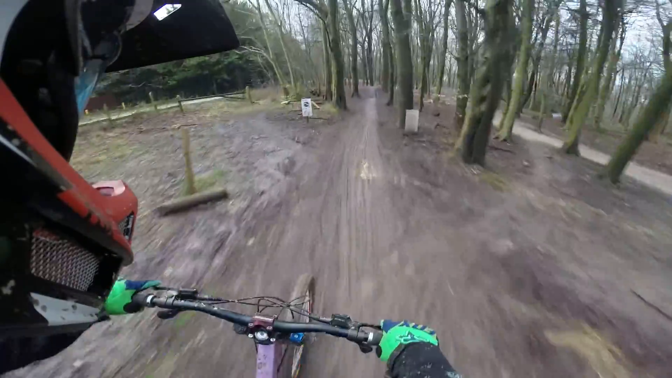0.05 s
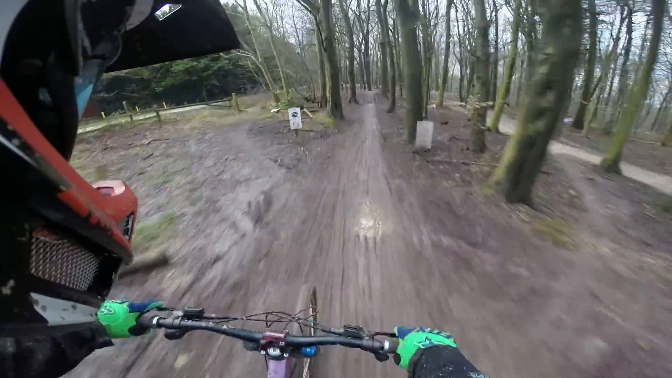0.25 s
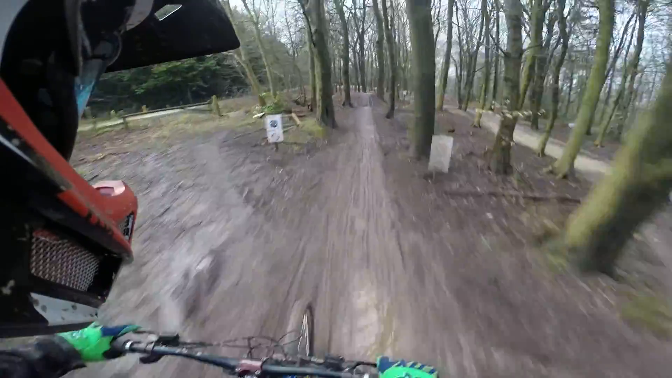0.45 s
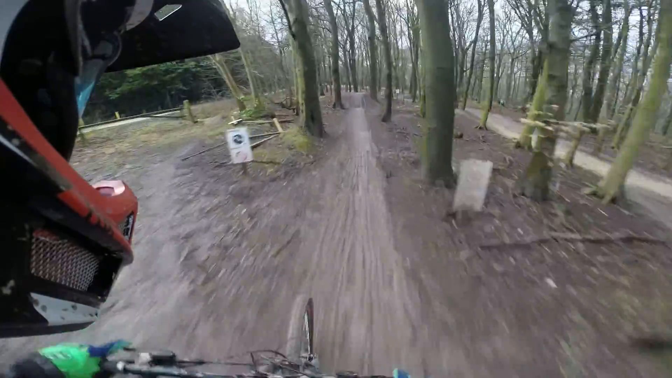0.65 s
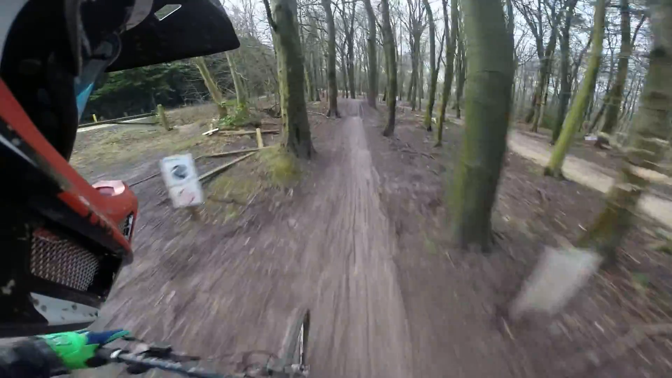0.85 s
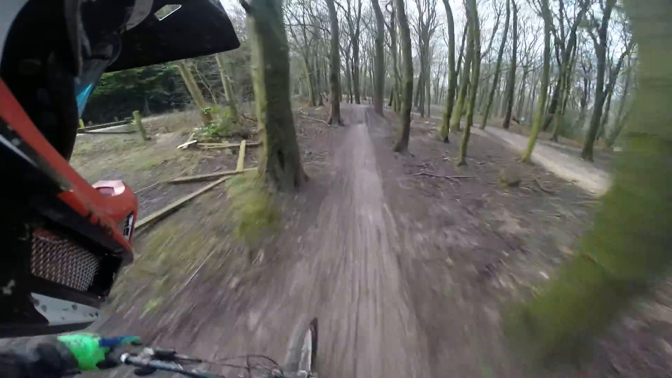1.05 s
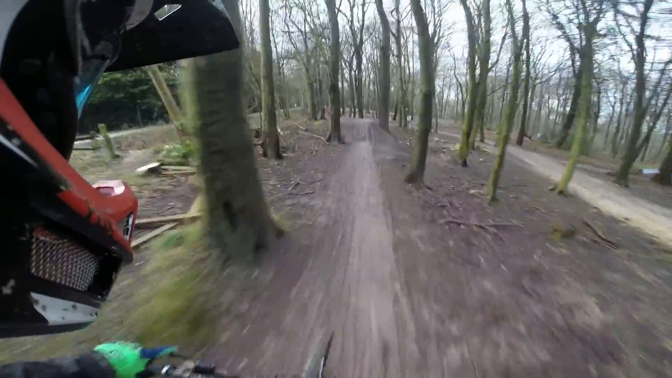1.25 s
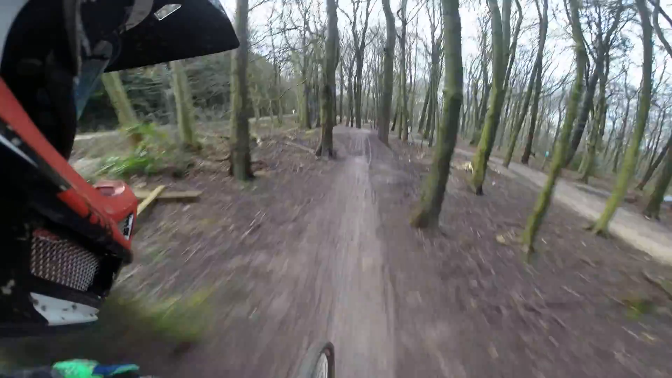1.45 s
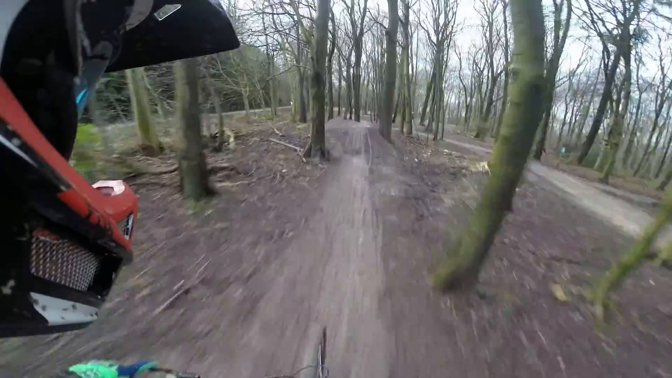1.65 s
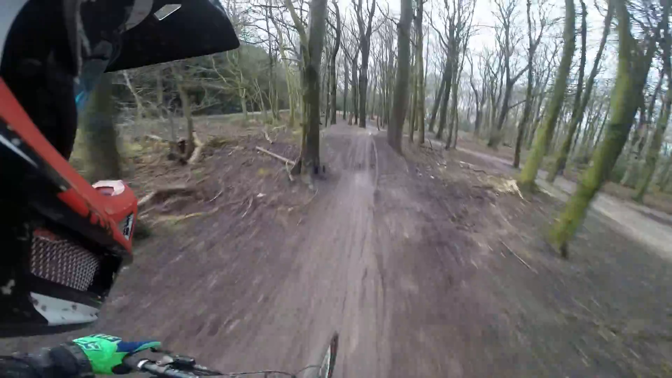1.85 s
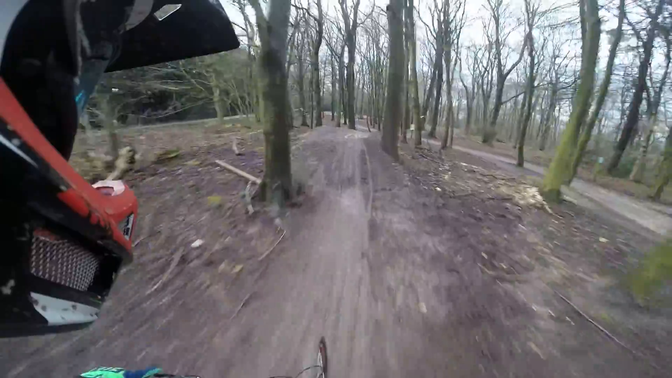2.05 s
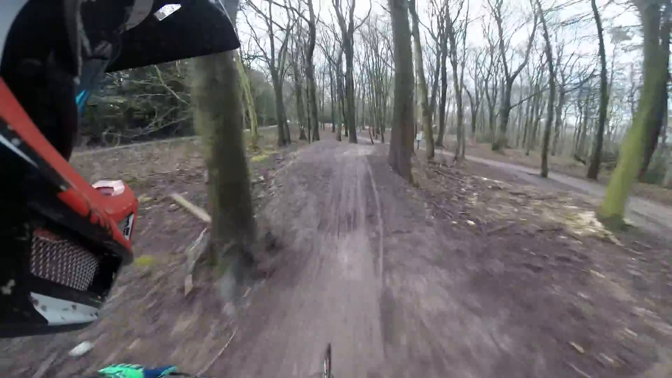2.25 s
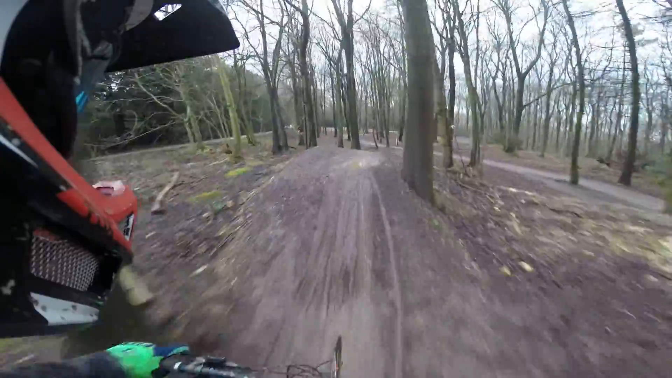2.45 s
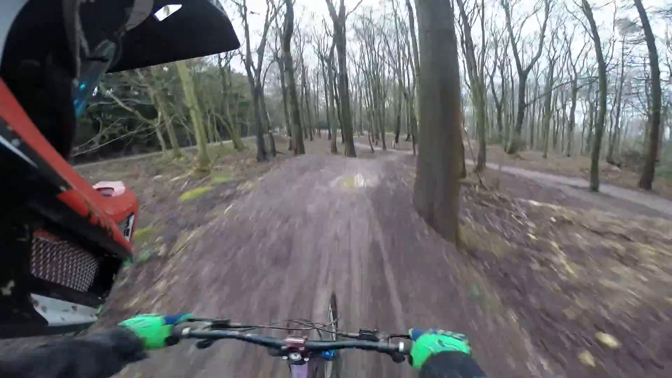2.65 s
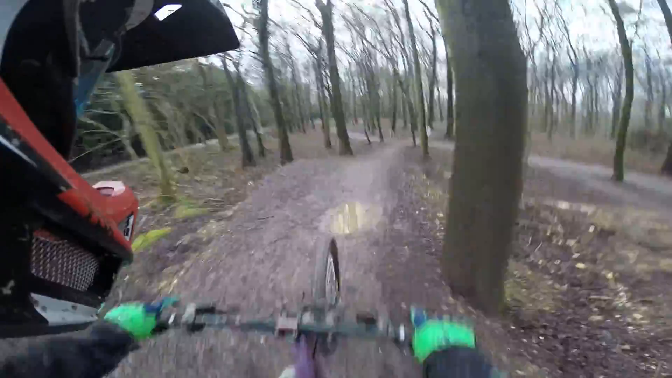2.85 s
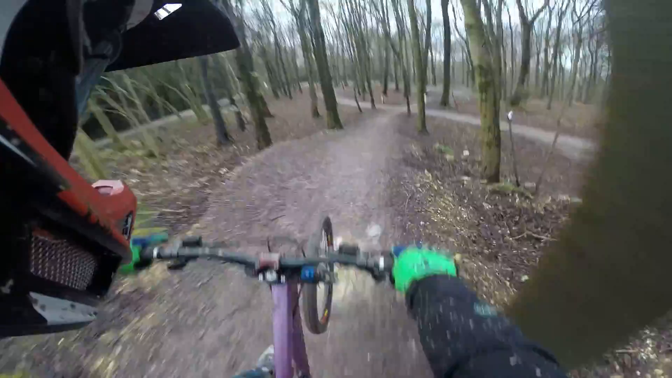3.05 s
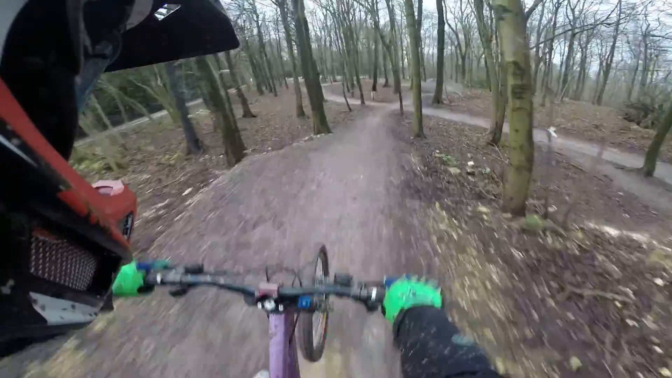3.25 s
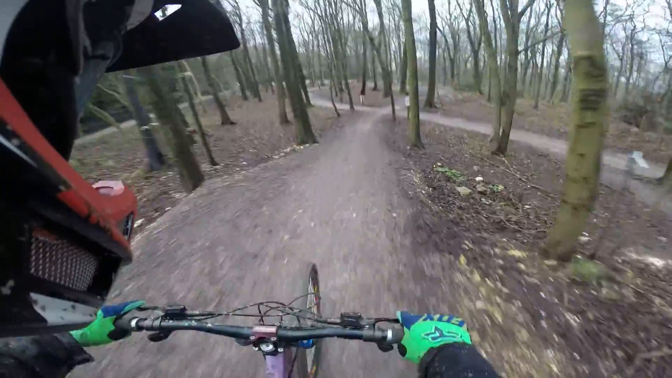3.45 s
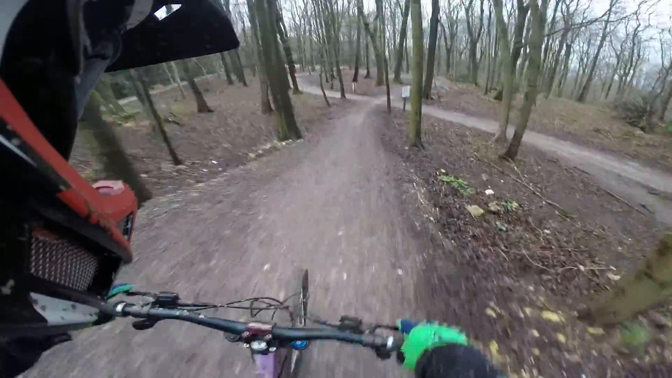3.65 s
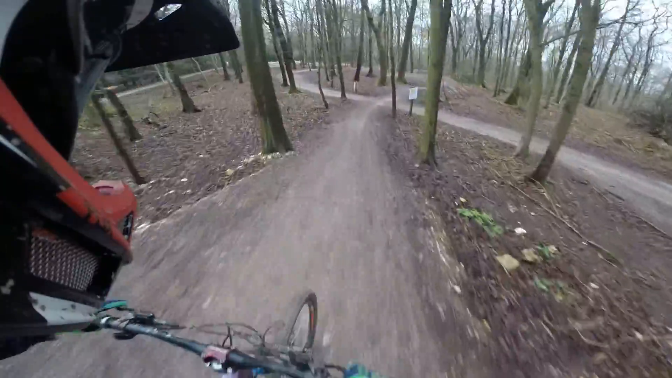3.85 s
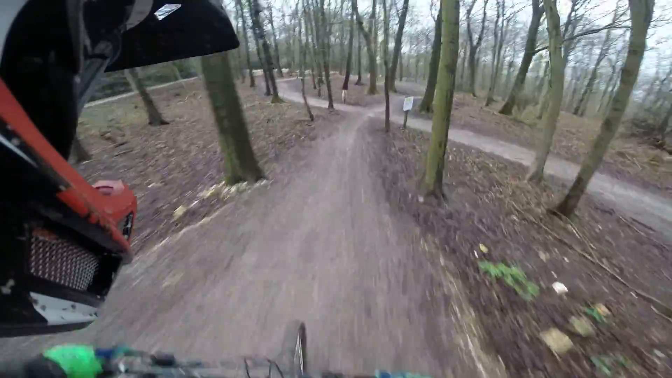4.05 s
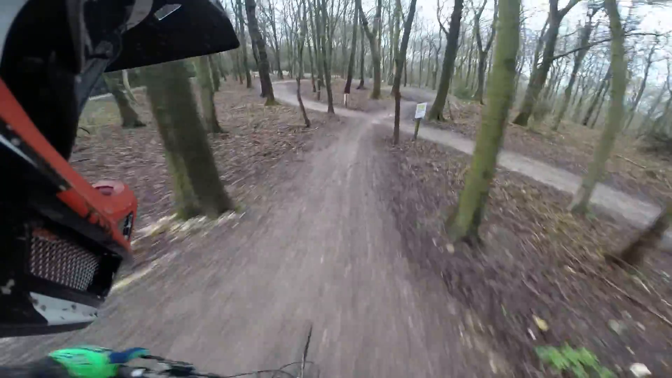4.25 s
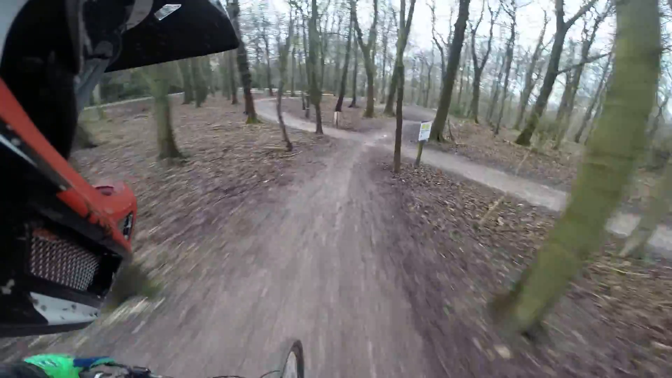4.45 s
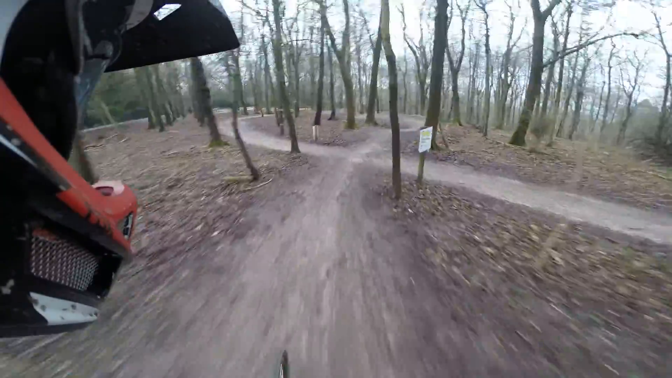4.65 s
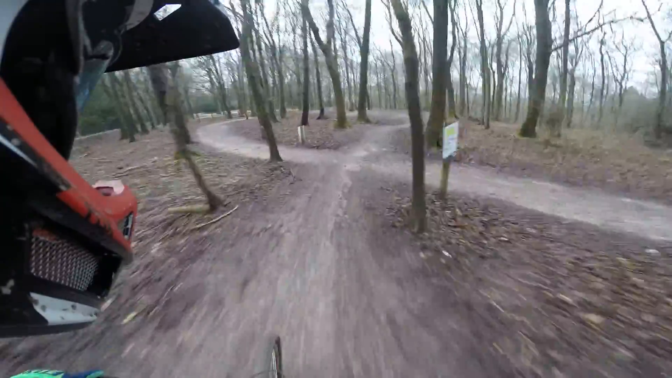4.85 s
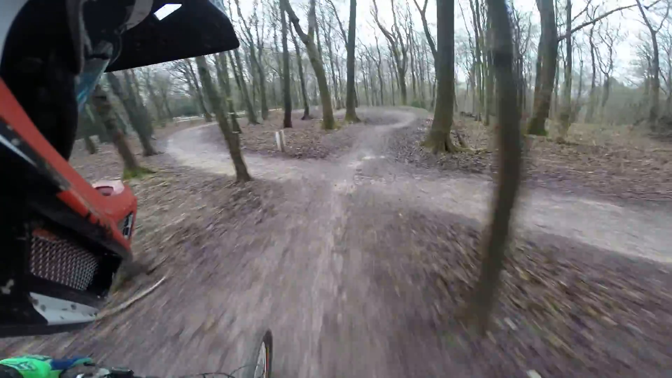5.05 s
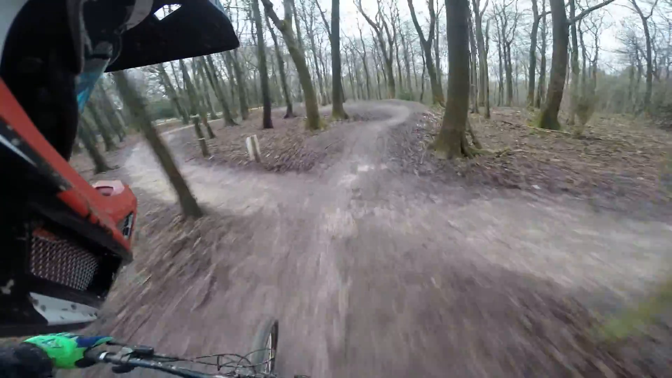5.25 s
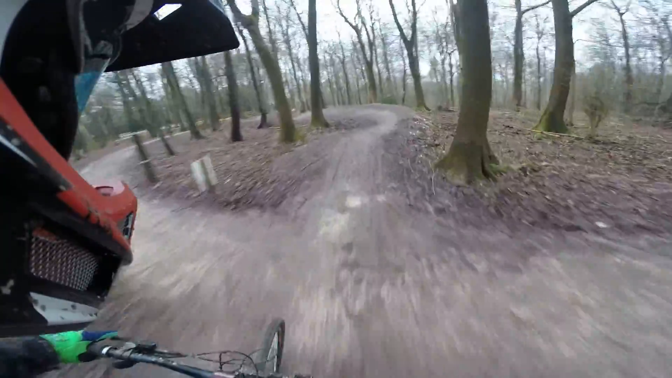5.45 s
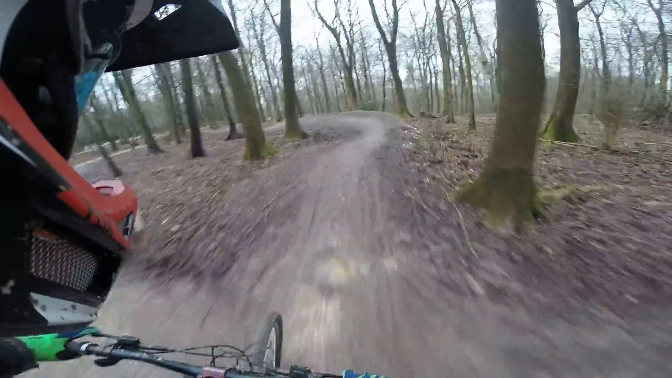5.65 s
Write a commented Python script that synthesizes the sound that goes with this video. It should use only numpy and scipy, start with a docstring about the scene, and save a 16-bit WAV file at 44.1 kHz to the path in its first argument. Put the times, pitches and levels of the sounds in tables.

```python
"""Wet dirt trail between trees: a bicycle descends, heard by a helmet camera in a closed housing.
The head shakes at very low pitch (filtered noise), with a few hard jolts (single swings); knocks ring the mount's modes.
Tyre rush, flung mud and wet slaps are noise and grains through the housing's resonances; wind is shaped noise.
Grit and rattles are short decaying rings; the electronics add faint steady tones and hiss."""
import sys
import numpy as np
from scipy import signal
from scipy.fft import rfft, irfft
from scipy.io import wavfile
from scipy.ndimage import uniform_filter1d

SR = 44100
rng = np.random.default_rng(int(sys.argv[2]) if len(sys.argv) > 2 else 0)


def level_to_linear(level):
    """Convert decibel levels to linear amplitude factors, elementwise."""
    exponent = np.asarray(level, float) / 20
    return 10 ** exponent


def generate_wav(signal):
    """Clip the signal to [-1, 1] and save it as 16-bit WAV at the path in sys.argv[1]."""
    frames = np.transpose(np.atleast_2d(signal))
    scaled = np.clip(frames, -1, 1) * 32767
    pcm = np.round(scaled).astype(np.int16)
    wavfile.write(sys.argv[1], SR, pcm)


N = 251370

# roots and ruts that shake the head: start_s, level_db
BUMPS = [(0.04, -27), (0.23, -31), (0.5, -30.5), (0.57, -28.5), (0.68, -25.5), (0.93, -30.5), (1.1, -27.5),
         (1.22, -26.5), (1.42, -27), (1.52, -31.5), (1.65, -24.5), (2.02, -25), (2.2, -30.5), (2.42, -28),
         (2.6, -36), (2.68, -31), (2.82, -25.5), (2.95, -27.5), (3.14, -25), (3.41, -32.5), (3.63, -29),
         (3.84, -27), (3.97, -33.5), (4.09, -35), (4.2, -36.5), (4.4, -29), (4.52, -31.5), (4.65, -29.5),
         (4.81, -46), (5.03, -46), (5.22, -43.5), (5.51, -27)]
# whole-body jolts: centre_s, level_db (before swing_factor), swing_hz, gaussian_sigma_s, swing_factor (signed)
JOLTS = [(2.751, -11.5, 24.8, 0.015, -1.26), (3.0446, -6.5, 35.3, 0.016, 0.84),
         (3.469, -10, 23.2, 0.013, -0.89), (3.528, -12, 32.2, 0.036, 0.73)]
# knocks on the mount: start_s, level_db (before mode level), hardness_db
KNOCKS = [(1.396, -38.5, -3.5), (1.709, -60, -13), (1.987, -39, -21), (2.721, -39.5, 6),
          (3.0478, -10.5, 0.4), (3.47, -33.5, -4), (3.774, -46.5, 7.5), (4.175, -50, -15)]
# modes of mount and shell: pitch_hz, level_db, knock_t60_s, hardness_share (0-1)
MOUNT_MODES = [(96.83, 0, 0.53, 0.06), (227, -4, 0.17, 0.86), (591.4, -9.5, 0.067, 0.2),
               (292, -13.5, 0.051, 1), (404, -14.5, 0.02, 1), (516, -16, 0.049, 0.74),
               (1008, -15.5, 0.041, 0.9), (1625, -2.5, 0.019, 0.8), (1946, 2.5, 0.011, 1)]
# lowest mode's hum, before waver: time_s, level_db
HUM = [(0, -54), (0.35, -51), (0.7, -57), (1.1, -50), (1.8, -48), (2.45, -51.5), (2.65, -52.5), (3.1, -53),
       (3.4, -52), (3.6, -40), (3.8, -57.5), (4.25, -52), (4.4, -61), (4.65, -49), (4.98, -63),
       (5.35, -55.5), (5.7, -60)]
# rattles of helmet and strap, before low-pass: start_s, level_db, pitch_hz, t60_s
RATTLES = [(1.6612, -26.5, 2110, 0.043), (1.6618, -24.5, 6100, 0.011), (2.3072, -25.5, 3220, 0.015),
           (3.212, -45, 452, 0.12), (3.4435, -30, 414, 0.018), (3.4485, -32, 490, 0.023),
           (3.4505, -36, 646, 0.035), (3.4605, -33.5, 1510, 0.013)]
# the ride, quiet while the wheels are off the ground: time_s, rush_db, spray_db (before waver and puffs)
RIDE = [(0, -44, -48.5), (0.2, -44.5, -47.5), (0.45, -45, -51.5), (0.6, -44.5, -47.5), (0.85, -43.5, -51.5),
        (0.95, -44, -54.5), (1.2, -43, -53), (1.5, -40, -49.5), (1.9, -42, -50), (2.25, -40.5, -49),
        (2.4, -42.5, -47), (2.66, -44, -50), (2.9, -47.5, -47.5), (3.02, -49.5, -55.5), (3.15, -47, -75),
        (3.25, -56.5, -71), (3.4, -54.5, -66), (3.43, -56, -50.5), (3.55, -50.5, -56.5), (3.7, -54, -66),
        (4.12, -50, -67), (4.25, -44.5, -73), (4.55, -42, -66), (5.1, -39.5, -72), (5.3, -41.5, -59),
        (5.7, -41.5, -64)]
# resonances of the housing: pitch_hz, width_hz, level_db (before tilt)
HOUSING_MODES = [(1594, 224, -6.5), (2135, 290, -2), (2490, 340, 1.35), (3124, 480, -4.5), (4480, 850, -17),
                 (6093, 356, -14), (7170, 400, -23), (9870, 2000, -29.5), (11240, 240, -24),
                 (13700, 4300, -33.5)]
# puffs of spray, about eleven a second once the tyres are back on the ground: start_s, level_db
PUFFS = [(3.6253, -58.5), (3.6961, -65), (3.763, -63), (3.8627, -58.5), (3.9944, -58.5), (4.1476, -58),
         (4.2683, -60.5), (4.3247, -58.5), (4.4284, -57), (4.4928, -51), (4.5936, -61), (4.6674, -53),
         (4.7617, -55), (4.8495, -54), (4.9518, -52), (5.0131, -52), (5.1393, -60), (5.2137, -60),
         (5.2795, -61), (5.3818, -56), (5.4307, -52), (5.5205, -53), (5.6592, -58)]
# tyres slapping into wet ground: start_s, body_db, spray_db, t60_s
SLAPS = [(0.52, -46, -48, .15), (0.699, -38.5, -58, 0.17), (1.131, -29, -68, 0.031),
         (1.375, -40, -62, 0.19), (2.635, -38, -53, 0.11), (2.673, -39, -42, 0.095),
         (2.698, -32, -49, 0.25), (2.745, -52, -44, 0.16), (2.844, -39, -59, 0.22),
         (2.861, -32.5, -61, 0.2), (2.96, -40, -61, .15), (3.4205, -37.5, -59, 0.3), (4.18, -45, -67, .1),
         (4.265, -35, -64, .1), (4.51, -35, -64, 0.073), (4.69, -35, -68, 0.096), (5.04, -38.5, -71, 0.13),
         (5.223, -41, -62, 0.092), (5.38, -53, -57, 0.12)]
# grit and stones striking the shell, before band filters: start_s, ring_db, ring_hz, tick_db (before random split)
GRIT = [(0.4488, -28, 2770, -40), (0.5536, -32.5, 1600, -30.5), (1.131, -33, 1980, -34),
        (1.3818, -25, 2630, -35), (1.879, -25, 2800, -34), (2.003, -26, 2490, -35),
        (2.3065, -11, 2320, -23.5), (2.6419, -26, 2350, -39), (2.7654, -35, 2980, -27),
        (2.825, -37, 3260, -38), (2.8454, -24, 3160, -41), (2.8667, -39, 2900, -31),
        (2.911, -28, 3050, -33), (3.213, -51, 2500, -37.5), (3.4267, -28, 2480, -38),
        (3.4405, -41, 2430, -44), (3.7537, -62, 1380, -42), (4.1931, -30, 2470, -44),
        (4.266, -28.5, 2430, -40), (5.2225, -29, 2280, -37), (5.3615, -32, 2360, -48)]
# spectrum shape of wind and frame noise: pitch_hz, relative_level_db
WIND_SHAPE = [(29, -13), (50, 3), (65, -42), (96, -28.5), (124, -15.5), (225, -19.5), (506, -24.5),
              (590, -27.5), (1400, -26.5), (1820, -21.5), (3080, -120)]
# steady whine of the electronics: pitch_hz, rms_db
WHINE = [(8780, -78), (11687, -86), (11719, -84), (14626, -84), (14653, -93)]


def rms_one(x):
    """Scale to rms 1."""
    return x / np.sqrt(np.mean(x ** 2) + 1e-20)


def in_time(rows):
    """Columns of a curve table at every sample."""
    time_s, *columns = np.transpose(rows)
    return [np.interp(np.arange(N) / SR, time_s, c) for c in columns]


def cut(x, hz, kind, order=2):
    """Butterworth filter."""
    return signal.sosfilt(signal.butter(order, hz, kind, fs=SR, output="sos"), x)


def drift(rate_hz):
    """Slow random curve, rms 1: low-passed noise."""
    return rms_one(cut(rng.standard_normal(N + SR), rate_hz, "low")[SR:])


def evened(x, span_s, keep):
    """Random swells pressed flat by the local power; rms 1."""
    local_power = uniform_filter1d(x ** 2, size=int(span_s * SR))
    return rms_one(x / np.sqrt(local_power + keep * np.mean(x ** 2)))


def ring(x, hz, t60_s):
    """Two-pole resonator: a unit click starts a decaying sine of height 1."""
    r, w = level_to_linear(-60 / (t60_s * SR)), 2 * np.pi * hz / SR
    return signal.lfilter([0, np.sin(w)], [1, -2 * r * np.cos(w), r * r], x + 1e-18)


def pings(rows):
    """Short rings, at most 0.1 s each: start_s, level_db, pitch_hz, t60_s."""
    out, span = np.zeros(N), SR // 10
    for start_s, level_db, hz, t60_s in rows:
        at = int(start_s * SR)
        out[at:at + span] += level_to_linear(level_db) * ring(np.arange(span) == 0, hz, t60_s)[:N - at]
    return out


def grains(per_s, spread_db):
    """Random clicks of random sign, a few much larger than the rest."""
    sizes = level_to_linear(spread_db * np.minimum(rng.exponential(1, N), 5)) * rng.choice([-1, 1], N)
    return sizes * (rng.random(N) < per_s / SR)


def dealt(clicks, bands_hz):
    """Each grain goes to one random band; band power grows with bandwidth; rms 1."""
    pick = rng.integers(0, len(bands_hz), N)
    out = 0
    for k, band in enumerate(bands_hz):
        own = rms_one(cut(clicks * (pick == k), band, "band"))
        out = out + own * np.sqrt(band[1] - band[0])
    return rms_one(out)


def swells(rows, rise_s, t60_s, floor_db):
    """Level in dB: each event swells quickly and dies away; powers add on a floor."""
    t, power = np.arange(N) / SR, level_to_linear(2 * floor_db)
    for start_s, level_db in rows:
        near = t - start_s
        rise, decay = np.exp(-(near / rise_s) ** 2), level_to_linear(-120 * near.clip(0) / t60_s)
        power = power + level_to_linear(2 * level_db) * np.where(near < 0, rise, decay)
    return 10 * np.log10(power)


def housing(x, tilt_db, flicker_db=0):
    """Parallel resonances of alternating sign, optionally fed unevenly; tilt in dB per octave about 2.5 kHz."""
    out = 0
    for k, (hz, width_hz, level_db) in enumerate(HOUSING_MODES):
        r = np.exp(-np.pi * width_hz / SR)
        fed = x * level_to_linear(flicker_db * drift(26.0)) if flicker_db else x + 1e-18
        band = signal.lfilter([1, 0, -1], [1, -2 * r * np.cos(2 * np.pi * hz / SR), r * r], fed)
        gain = level_to_linear(level_db + tilt_db * np.log2(hz / 2500)) * (1 - r * r) / 2
        out = out + (-1) ** k * gain * band
    return cut(cut(out, 1070, "high", order=4), 5930, "low")


def head_shake():
    """Bumps swing head and camera below 50 Hz; the noise's random swells are pressed flat."""
    level_db = swells(BUMPS, rise_s=0.033, t60_s=0.59, floor_db=-41.5)
    swing = cut(cut(rng.standard_normal(N + SR), 38.45, "low", order=10), 13.8, "high", order=1)[SR:]
    return level_to_linear(level_db) * evened(swing, 0.0586, keep=0.058)


def jolts():
    """Each jolt is one heavy swing out and back: a sine under a Gaussian."""
    t, out = np.arange(N) / SR, np.zeros(N)
    for centre_s, level_db, hz, sigma_s, factor in JOLTS:
        swing = np.sin(2 * np.pi * hz * (centre_s - t))
        out += factor * level_to_linear(level_db) * swing * np.exp(-((t - centre_s) / sigma_s) ** 2 / 2)
    return out


def mount_knocks():
    """Knocks ring all modes, each lifted by its share of the hardness; parts chatter for a few milliseconds."""
    start_s, level_db, hardness_db = np.transpose(KNOCKS)
    at, rings, clicks = (start_s * SR).astype(int), np.zeros(N), np.zeros(N)
    for hz, mode_db, t60_s, share in MOUNT_MODES:
        strikes = np.zeros(N)
        strikes[at] = -level_to_linear(level_db + mode_db + share * hardness_db)
        rings += ring(strikes, hz, t60_s)
    clicks[at] = level_to_linear(level_db + hardness_db - 6)
    decay = signal.lfilter([1], [1, -level_to_linear(-60 / (0.027 * SR))], clicks + 1e-18)
    chatter = cut(decay * rng.standard_normal(N), [500, 2300], "band")
    return cut(rings + chatter, 1750, "low", order=4)  # soft contact: little treble


def mount_hum():
    """Steady shaking, as noise, keeps the three main modes humming."""
    waver_db = 2
    (hum_db,) = in_time(HUM)
    levels_db = hum_db + waver_db * drift(4.4), -63.5 + waver_db * drift(10.2), -67
    out = 0
    for (hz, _, t60_s, _), level_db in zip(MOUNT_MODES[:3], levels_db):
        tone = ring(rng.standard_normal(N), hz, 1.62 * t60_s)
        out = out + level_to_linear(level_db) * evened(tone, 0.17, keep=0.27)
    return out


def rattles():
    """Helmet and strap parts ring briefly, dulled by a low-pass."""
    return cut(pings(RATTLES), 5400, "low")


def tyre_rush(level_db):
    """Tyre knobs on wet dirt and wind: noise with clumped grain through the housing."""
    clumped = grains(1200 * level_to_linear(3.3 * drift(20)), 2.55)
    grain = dealt(clumped, [[1200, 1850], [1900, 2560], [2600, 3400], [3500, 6800]])
    source = rng.standard_normal(N) + 0.38 * grain
    return level_to_linear(level_db) * evened(housing(source, tilt_db=-2.0, flicker_db=1.05), 0.072, keep=0.083)


def mud_spray(ride_db):
    """Mud and water flung off the tyres: clumped drops on fine mist, with short puffs."""
    level_db = swells(PUFFS, rise_s=0.0079, t60_s=0.2, floor_db=ride_db + 1.6 * drift(14.4))
    clumped = grains(2000 * level_to_linear(3.5 * drift(30)), 1.4)
    drops = dealt(clumped, [[3500, 5560], [5000, 11400], [7500, 13100], [10500, 15500]])
    source = 0.44 * drops + 0.5 * rng.standard_normal(N)
    bright = cut(housing(source, tilt_db=5.5, flicker_db=2.0), 3430, "high", order=4)
    return level_to_linear(level_db) * rms_one(bright)


def wet_slaps():
    """Sudden rough bursts that die away, in the housing's body and in the treble."""
    rise_s = 0.0022
    t, rough, out = np.arange(N) / SR, rms_one(grains(2000, 1.2)), np.zeros(N)
    body = rms_one(housing(rough, tilt_db=1.5))
    bright = rms_one(cut(housing(rough, tilt_db=13.0), 3300, "high", order=4))
    for start_s, body_db, spray_db, t60_s in SLAPS:
        near = t - start_s
        envelope = (near / rise_s).clip(0, 1) * level_to_linear(-60 * np.maximum(near, 0) / t60_s)
        out += envelope * (level_to_linear(body_db) * body + level_to_linear(spray_db) * bright)
    return out


def grit():
    """Each speck rings at its own pitch and ticks in two upper shell modes, a dry snap on top."""
    start_s, ring_db, ring_hz, tick_db = np.transpose(GRIT)
    split_db, same = rng.normal(0, 1.6, (len(start_s), 2)), np.ones(len(start_s))
    body = pings(zip(start_s, ring_db, ring_hz, 0.0093 * same))
    ticks = np.zeros(N)
    for k, hz in enumerate((4530, 5680)):
        ticks += pings(zip(start_s, tick_db + split_db[:, k], hz * same, 15 / hz * same))  # t60: 15 cycles
    snaps = pings(zip(start_s, ring_db - 24, 12100 * same, 0.0024 * same))
    return cut(body, [1000, 3800], "band") + cut(ticks, [3500, 7500], "band") + cut(snaps, [10000, 14500], "band")


def wind(rush_db):
    """Dull fluttering noise of wind and frame, partly following the rush; level set in 300-1100 Hz."""
    level_db = -58.5 + 0.35 * (rush_db - rush_db.mean())
    shape_hz, shape_db = np.transpose(WIND_SHAPE)
    hz = np.maximum(np.fft.rfftfreq(N, 1 / SR), 1)
    shape = level_to_linear(np.interp(np.log(hz), np.log(shape_hz), shape_db))
    noise = irfft(rfft(rng.standard_normal(N)) * shape, N)
    return level_to_linear(level_db + 0.58 * drift(10.0)) * noise / np.std(cut(noise, [300, 1100], "band"))


def electronics():
    """Thin steady sines over the preamplifier's band-limited hiss."""
    t, tones = np.arange(N) / SR, np.zeros(N)
    for hz, rms_db in WHINE:
        tones += np.sqrt(2) * level_to_linear(rms_db) * np.sin(2 * np.pi * hz * t)
    hiss = rms_one(cut(rng.standard_normal(N), [3000, 11000], "band", order=1))
    return tones + level_to_linear(-71.5) * hiss


def scene():
    """All layers on one microphone."""
    rush_db, spray_db = in_time(RIDE)
    body = head_shake() + jolts() + mount_knocks() + mount_hum() + rattles()
    air = tyre_rush(rush_db) + mud_spray(spray_db) + wet_slaps() + grit() + wind(rush_db)
    return (body + air + electronics())[None]


def roll_off(x):
    """The treble ends steeply here."""
    return signal.sosfilt(signal.butter(12, 16130, fs=SR, output="sos"), x)


def record(dry):
    """Two steep low-passes in series cut the top of the treble."""
    top_hz = 15150
    once = cut(dry, top_hz, "low", order=16)
    mix = cut(once, top_hz, "low", order=16)
    return roll_off(mix)


dry = scene()
out = record(dry)
generate_wav(out)
```